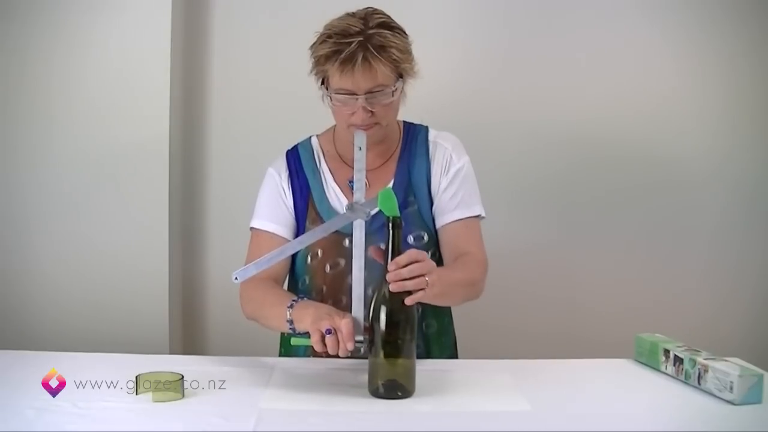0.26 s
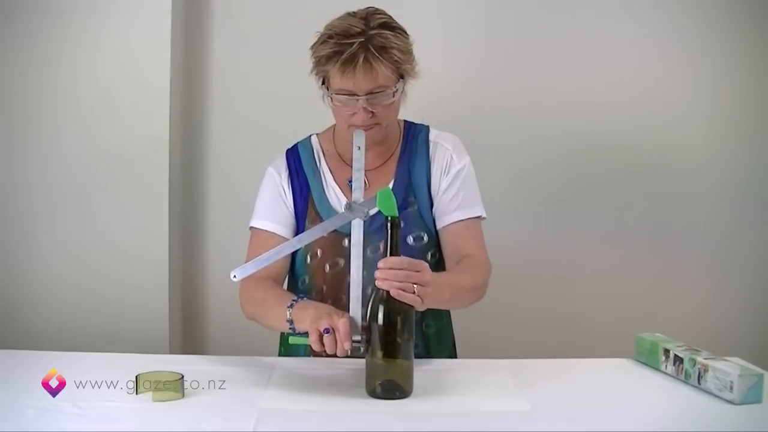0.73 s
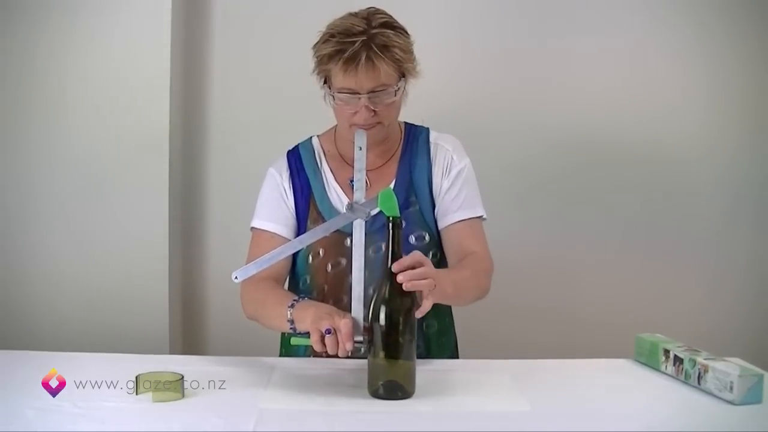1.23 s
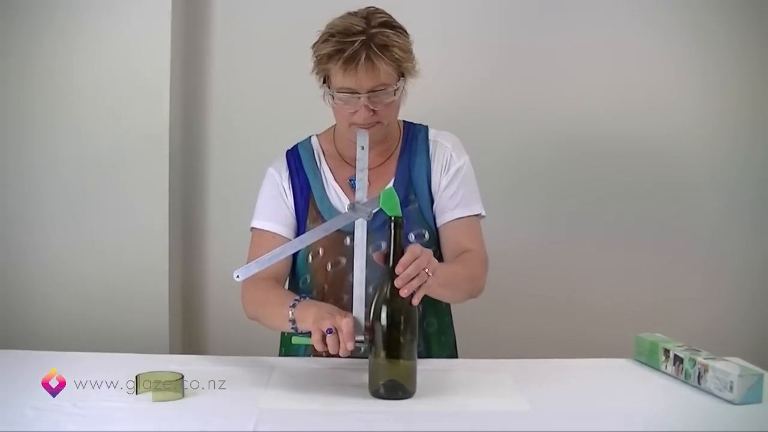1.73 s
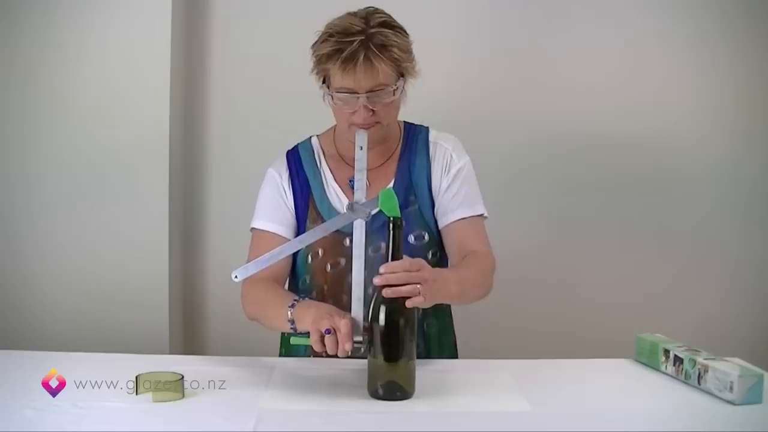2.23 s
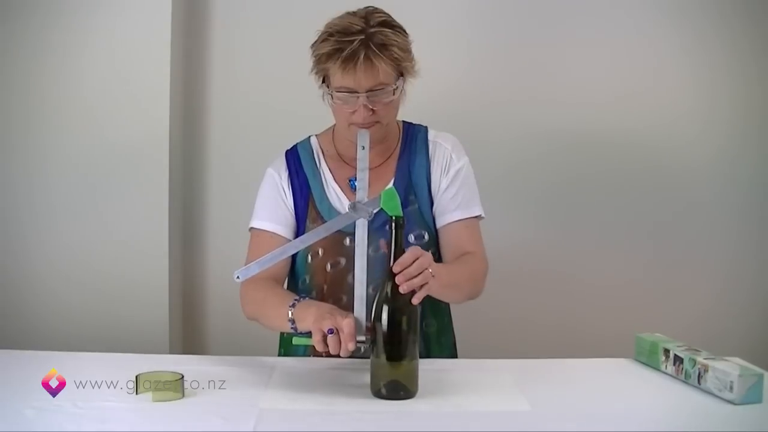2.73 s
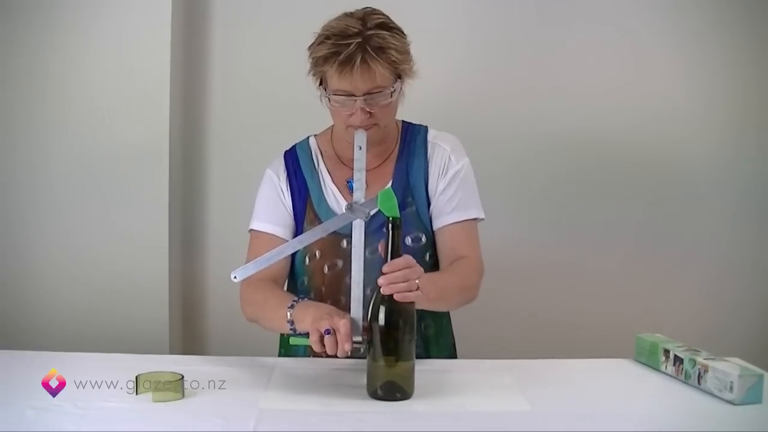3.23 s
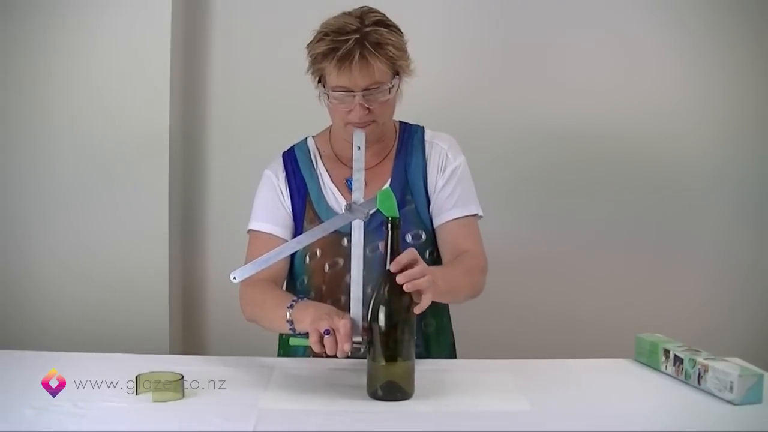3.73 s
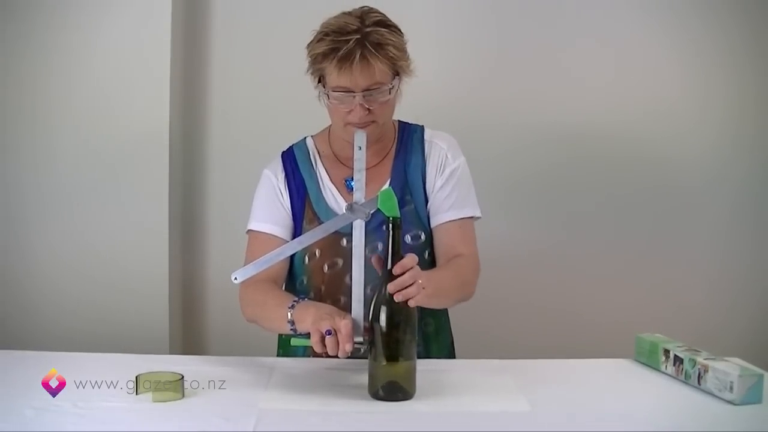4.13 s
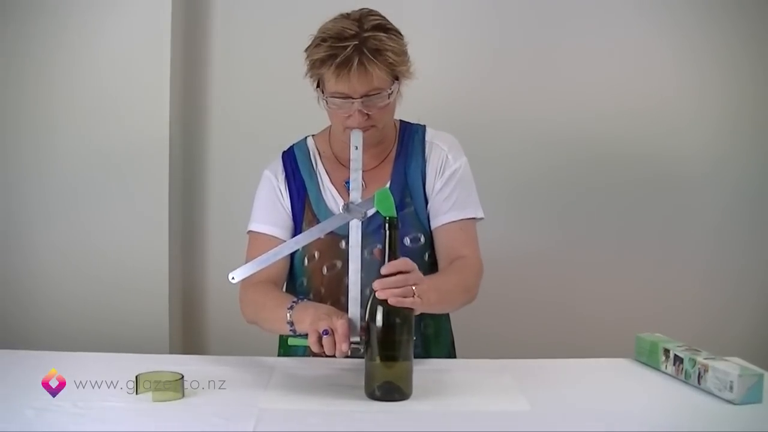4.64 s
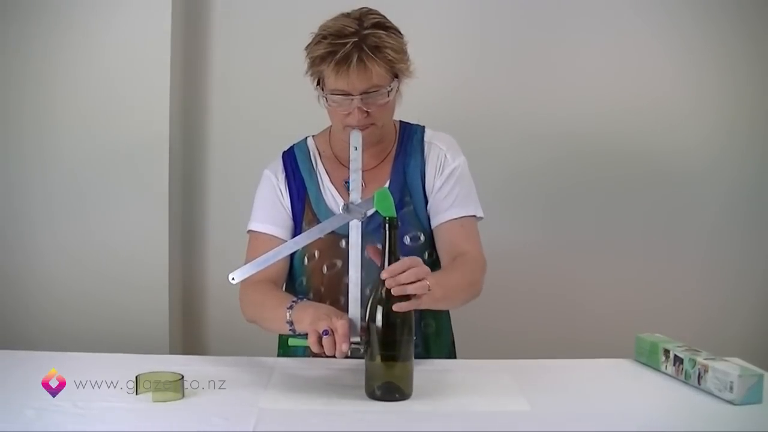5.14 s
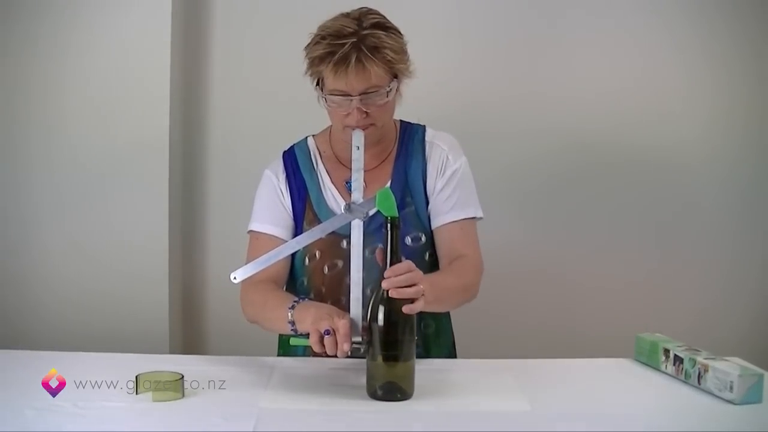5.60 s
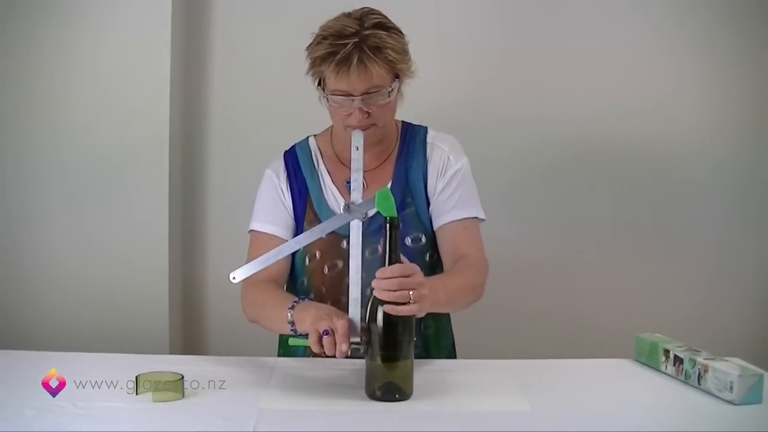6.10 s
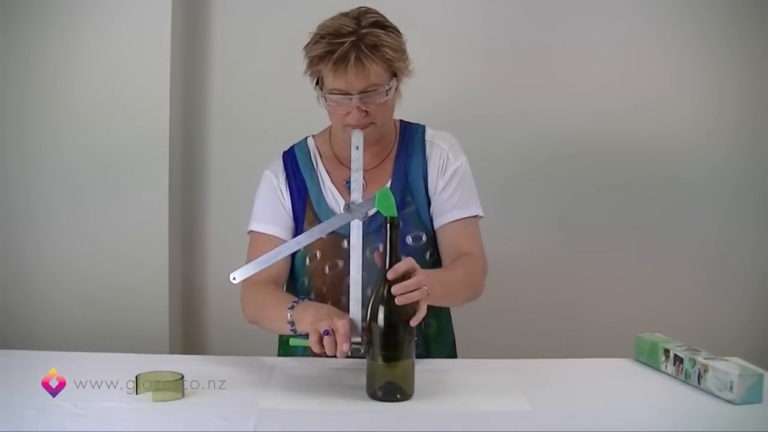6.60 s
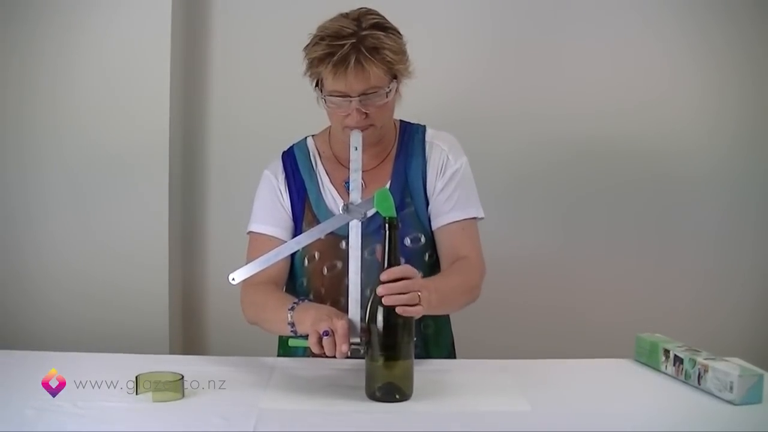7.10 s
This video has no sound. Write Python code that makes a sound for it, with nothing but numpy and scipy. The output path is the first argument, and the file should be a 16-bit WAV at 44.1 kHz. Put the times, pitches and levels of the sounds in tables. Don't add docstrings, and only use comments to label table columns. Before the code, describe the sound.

Thin, dry scratching of a wheel on glass, close to a stereo microphone: uneven short strokes, stuttering as the wheel sticks, with light ticks and a low scrape of the bottle on the table. One hard metallic-glassy crack far louder than everything else, two muffled bounces, more strokes, a bright ring tap, and light scratching to the end. Faint room hum throughout.

```python
import sys
import numpy as np
from scipy import signal
from scipy.fft import rfft, irfft
from scipy.io import wavfile
from scipy.ndimage import uniform_filter1d

SR = 44100
rng = np.random.default_rng(int(sys.argv[2]) if len(sys.argv) > 2 else 0)


def natural_amplitude(level_db):
    exponent = np.asarray(level_db, float) / 20
    return 10 ** exponent


def unload_wav(signal):
    wavfile.write(
        sys.argv[1],
        SR,
        np.round(np.clip(np.atleast_2d(signal).T, -1, 1) * 32767).astype(np.int16),
    )


N = 324511

# start_s, peak_db, brightness_db, blow_into_glass_db
TICKS = [(.004, -36.5, -12, -4), (1.009, -42, -14, 2), (3.1914, -21, -8, -25), (0.1412, -34, -8, -14),
         (0.3445, -21, -30, -20), (0.3505, -28, -30, -13), (0.4504, -25, -4, -10), (0.4565, -32, -10, -10),
         (0.463, -31, -8, -4), (0.472, -26, -9, -3), (0.2863, -28, -8, -1), (0.5815, -36, -8, -6),
         (0.585, -32, -12, -10), (0.595, -30.5, -9, 0), (0.5744, -30, -5, -5), (0.601, -37, -5, -9),
         (0.8446, -34.5, -3, -1.5), (1.719, -28.5, -24, -6), (1.799, -20, -32, -17), (1.851, -35, -12, -8),
         (1.877, -19.5, -10, -15), (2.6668, -43.5, -7, -2), (2.975, -34, -12, 10), (3.6523, -38, -13, 7.5),
         (3.66, -38, -13, 0), (4.2272, -39, 1, -14), (4.4004, -40.5, -5, 2), (4.417, -42, -11, 7),
         (4.448, -40, -14, 0), (4.441, -34.5, -11, 0), (4.548, -37, -10, 2.5), (5.5708, -34, -15, -13),
         (5.626, -35, -5, -15), (5.768, -36, -11, -4), (5.957, -36, -11, 4), (6.0144, -35.5, -13, 8.5),
         (6.2478, -30, -21, -8), (6.813, -33, -9, -1.5), (6.888, -40, -10, 5), (6.933, -37, -15, 7),
         (6.9515, -24, -34, -2), (6.961, -33, -18, 6), (7.0441, -33, -22, 10), (7.052, -36, -25, 0),
         (7.1517, -31, -10, 6), (7.158, -36, -12, 4), (7.164, -36, -8, 1), (7.17, -36, -12, 3),
         (7.199, -38, -12, 1), (7.209, -40, -14, -1)]


def evened(x):
    return x / np.sqrt(np.mean(x ** 2) + 1e-20)


def read(points, hz):
    f, value = np.transpose(points)
    return np.interp(np.log(hz + 1), np.log(f + 1), value)


def drift(per_s, count):
    knots = rng.standard_normal((count, int(N / SR * 60) + 3))
    knots = signal.lfilter([1], [1, -np.exp(-min(per_s, 50) / 10)], knots)
    return [np.interp(np.arange(N) * 60 / SR, np.arange(len(k)), evened(k)) for k in knots]


def ring(x, hz, width):
    r = np.exp(-np.pi * width / SR)
    w = 2 * np.pi * hz / SR
    return np.sqrt(2 * (1 - r * r)) * signal.lfilter([0, np.sin(w)], [1, -2 * r * np.cos(w), r * r], x)


def resonate(x, hz, width):
    turn = np.exp(2j * np.pi * np.cumsum(hz * np.ones(N)) / SR)
    r = np.exp(-np.pi * width / SR)
    return np.sqrt(2 * (1 - r * r)) * (turn * signal.lfilter([1], [1, -r], x / turn)).real


def air():
    # pitch_hz, level_db_per_hz
    noise_spectrum = [(21, -30), (35, -25), (102, -6), (148, -5), (181, -7), (227, -19), (263, -0.5),
                      (291, -7), (402, -8), (491, -13.5), (614, -14), (1170, -21.5), (1470, -24.5),
                      (3030, -30), (13500, -43)]
    # pitch_hz, likeness_0_to_1
    likeness = [(28, .3), (60, 0.81), (180, 0.96), (550, 0.93), (1650, 0.71), (4970, 0.75), (15000, 1)]
    # pitch_hz, width_hz, level_db
    hum_lines = [(98.6, 5.2, -61.5), (182.64, 7.7, -56), (264.6, 14, -59), (56.4, 15, -57),
                 (412, 25, -74.5), (626, 1.4, -71)]
    noise_db, noise_edge_hz = -48.5, 13620
    mains_hz, mains_db = 99.6, -53

    frames, hz = N // 512 + 5, np.fft.rfftfreq(2048, 1 / SR)
    a, b, c, d, patches = rng.standard_normal((frames, 1025, 5)).T
    patches = uniform_filter1d(uniform_filter1d(patches, size=10, axis=0), size=10, axis=1)
    patches = evened(patches)
    same = np.clip(read(likeness, hz), -1, 1)[:, None]
    left = a + 1j * b
    right = same * left + np.sqrt(1 - same ** 2) * (c + 1j * d)
    level = natural_amplitude(read(noise_spectrum, hz)[:, None] + 1.9 * patches) * (hz < noise_edge_hz)[:, None]
    noise = signal.istft(np.array([left, right]) * level, nperseg=2048, noverlap=1536)[1][:, :N]
    noise = natural_amplitude(noise_db) * evened(noise)

    hum = sum(natural_amplitude(db) * ring(rng.standard_normal(N), f, width) for f, width, db in hum_lines)
    wobble = 1.2 * drift(1.5, count=1)[0]
    hum += natural_amplitude(mains_db) * np.sin(2 * np.pi * mains_hz * np.arange(N) / SR + wobble)
    return noise * natural_amplitude([[.4], [-.4]]) + hum


def knock(t, bright_db, fade_s, hz):
    swell = ((t / fade_s) * np.exp(1 - t / fade_s)) ** 2
    blunt = np.sin(2 * np.pi * hz * t - np.pi) * swell
    edge = np.sin(2 * np.pi * 7800 * t) * (t / .0001) * np.exp(-t / .0001)
    return blunt + natural_amplitude(bright_db + 7.5) * edge


def ticks():
    out, t = np.zeros(N + 300), np.arange(300) / SR
    for s, peak_db, bright_db, _ in TICKS:
        tick = knock(t, bright_db, fade_s=.00022, hz=3500 + 35 * bright_db)
        out[round(s * SR):][:len(t)] += natural_amplitude(peak_db - 3) * tick
    return out[:N]


def push(start, rise, hold, level_db, start_db, stop_db_per_s):
    t = np.arange(0, N, 32) / SR - start
    rise = max(rise, .001)
    db = start_db * np.clip(1 - t / rise, 0, 1) - stop_db_per_s * np.maximum(t - rise - hold, 0)
    return natural_amplitude(level_db + db) * (t >= 0)


def fill(gain):
    return np.interp(np.arange(N), np.arange(0, N, 32), gain)


def chatter(low):
    slips_per_s, fade_s, slow_share, smooth_db = 90, .004, .65, -39.5
    slips = (rng.random(N) < slips_per_s / SR) * rng.uniform(0.62, 1, N)
    bursts = evened(signal.lfilter([1], [1, -np.exp(-1 / (fade_s * SR))], slips))
    share = slow_share / (1 + (low / natural_amplitude(smooth_db)) ** 4)
    return np.sqrt(1 - share + share * bursts ** 2)


def jolts():
    # start_s, treble_peak_db
    early_jolts = [(0.2745, -31), (0.3596, -33.5), (0.4493, -44), (0.573, -39), (0.593, -29), (0.6398, -44),
                   (0.662, -26), (0.7097, -23), (0.7385, -29), (0.7513, -20), (0.8434, -42), (1.7289, -44),
                   (1.7772, -47), (1.7827, -45), (1.843, -23.5), (1.875, -39), (1.905, -28), (1.955, -26),
                   (2.0023, -23), (2.975, -36), (3.0339, -38), (3.0986, -25), (3.2923, -26), (3.3387, -25),
                   (3.656, -41), (4.2257, -52), (4.398, -48), (4.547, -43), (4.7714, -41), (4.7984, -36)]
    # start_s, treble_peak_db
    last_jolts = [(5.5662, -39), (5.575, -43), (5.583, -38), (5.678, -37), (5.728, -41), (5.776, -43),
                  (5.81, -32), (5.82, -38), (5.872, -45), (5.977, -45), (6.05, -49), (5.6238, -32),
                  (5.6455, -41), (5.6679, -38), (5.6963, -31), (5.768, -32), (5.7987, -39), (5.8406, -38),
                  (5.9564, -38), (6.014, -44), (6.0361, -42), (6.0591, -44), (6.072, -33), (6.2458, -40),
                  (6.7111, -47), (6.7233, -32), (6.813, -45), (6.8413, -33), (6.8875, -32), (6.932, -27.5),
                  (6.9904, -42), (7.011, -34), (7.0438, -45), (7.1236, -45), (7.1511, -33.5), (7.199, -35),
                  (7.275, -48), (7.2878, -53), (7.3177, -42)]
    fade_s = 0.0043
    kicks = np.zeros(N)
    for s, peak_db in early_jolts + last_jolts:
        kicks[round(s * SR)] = natural_amplitude(peak_db)
    return signal.lfilter([1], [1, -np.exp(-1 / (fade_s * SR))], kicks)


def pressure():
    # start_s, rise_s, hold_s, scoring_level_db, brightness_db
    strokes = [(0.242, 0.029, 0.036, -39.5, -4.5), (0.435, 0.03, 0.039, -41.5, -5),
               (0.61, 0.044, 0.022, -33.5, -8), (0.701, 0.016, 0.051, -31.5, -6),
               (1.766, 0.012, 0.11, -42, -1), (1.879, 0.044, 0.2, -33.5, -5),
               (2.951, 0.024, 0.092, -39, -4.5), (3.083, 0.0087, 0.23, -36, -6.5),
               (3.252, 0.027, 0.1, -33, -8), (4.625, 0.076, 0.1, -34, -3.5), (5.619, 0.016, 0.089, -44, -7),
               (5.765, 0.0087, 0.1, -42.5, -5), (6.029, 0.067, 0.023, -30, -5.5),
               (6.877, 0.006, 0.026, -43.5, -0.5), (6.942, 0.063, 0.05, -39.5, -3),
               (7.09, .006, 0.052, -46.5, -5.5), (7.139, 0.006, 0.045, -43.5, -3)]
    # start_s, rise_s, scoring_level_db, brightness_db
    short_slips = [(.132, 0.012, -66, -6), (.555, 0.039, -37.5, -12), (.838, 0.0082, -46.5, -8),
                   (.97, 0.036, -50, -8), (1.716, 0.0028, -55, 1), (1.871, 0.0055, -46, -4),
                   (2.66, .006, -63, -3), (3.652, 0.001, -48.5, -0.5), (4.18, 0.032, -54, -5),
                   (4.31, 0.022, -53.5, -10), (4.396, 0.0044, -45.5, -4), (4.436, .004, -48, -4),
                   (4.546, 0.043, -34, -4.5), (5.324, 0.005, -46.5, -3.5), (5.561, 0.015, -34.5, -7.5),
                   (5.95, 0.025, -45.5, -3), (6.7, 0.0089, -49, 3), (6.81, 0.0043, -45.5, -7),
                   (6.838, 0.0033, -48, -4), (6.92, 0.028, -32.5, -10), (7.268, 0.017, -40.5, -6)]
    start_db = -18
    stop_db_per_s, slip_db_per_s = 460, 326
    creep_db, creep_db_per_s = -25, 48

    low = high = 0
    for start, rise, hold, level_db, bright_db in strokes:
        gain = push(start, rise, hold, level_db, start_db, stop_db_per_s)
        gain += push(start, rise, hold, level_db + creep_db, start_db, creep_db_per_s)
        low, high = np.hypot(low, gain), np.hypot(high, gain * natural_amplitude(bright_db))
    for start, rise, level_db, bright_db in short_slips:
        gain = push(start, rise, 0, level_db, start_db, slip_db_per_s)
        low, high = np.hypot(low, gain), np.hypot(high, gain * natural_amplitude(bright_db))
    low, high = fill(low), fill(high)
    jolt = natural_amplitude(-4.5) * jolts()
    return np.hypot(low, jolt), np.hypot(high * chatter(low), jolt)


def cracks(per_s, spread_db):
    size = natural_amplitude(spread_db * np.minimum(rng.exponential(1, N), 5))
    return evened(size * rng.choice([-1., 1.], N) * (rng.random(N) < per_s / SR))


def scatter(x):
    return x * (2 * rng.integers(0, 2, N, dtype=np.int8) - 1)


def scoring():
    wall_hz = [2020, 2865, 3430, 4060, 5280, 5770, 6560, 7115, 7930, 9020, 9440, 10900, 11200, 11700, 12050,
               13100, 14100, 2885, 4085]
    # width_hz, level_db
    wall = [(80.7, -13), (28, 1), (70.4, -9.5), (17.8, -5.5), (90, -25), (70.2, -16.5), (35.2, -14),
            (64, -8), (34.4, -32), (49.7, -16.5), (60.5, -12), (150, -17), (91.3, -15), (50, -26),
            (50, -16.5), (130, -29.5), (90, -22), (10, 3.5), (8.95, 2)]
    # pitch_hz, width_hz, level_db
    pressed = [(2580, 60, -1), (4130, 50, -4), (4610, 50, -1.5), (4790, 70, -9)]
    # pitch_hz, width_hz, level_db
    arm = [(3110, 62, 0), (4440, 66, -1), (2530, 60, -10), (3660, 50, -11)]
    # time_s, light_contact_share_0_to_1, arm_pitch_factor
    lean = [(.56, .75, 1.01), (.72, .05, 1.006), (1.72, .8, 1), (1.77, .05, 1), (2.98, .15, 1.01),
            (3.0, .95, 1), (3.045, .95, 1.018), (3.09, .9, 1.004), (3.11, .05, 1), (3.45, .05, 1),
            (3.64, .75, 1.01), (4.73, .95, .997), (4.84, .95, .965), (5.5, .95, .99), (5.56, .15, .997),
            (6.1, .2, .99), (6.7, .9, 1), (7.3, .95, .985)]
    # pitch_hz, level_db_per_hz
    grit_spectrum = [(530, -20.5), (900, -37), (1600, -0.5), (2200, 1.5), (2860, 2.5), (4600, 4),
                     (6120, -20.5), (6980, -2), (8150, -15), (11100, -14), (14600, -31), (15500, -69)]

    drive = cracks(per_s=4000, spread_db=2.5) * natural_amplitude(2.06 * drift(13, count=1)[0])
    low, high = drive * np.array(pressure()) * natural_amplitude([[0], [7.5]])
    blows, bright_blows = np.zeros(N), np.zeros(N)
    for s, peak_db, bright_db, blow_db in TICKS:
        blows[round(s * SR)] = natural_amplitude(peak_db + blow_db + 16.0)
        bright_blows[round(s * SR)] = natural_amplitude(peak_db + blow_db + bright_db + 28.0)

    s, light, arm_pitch = np.transpose(lean)
    t = np.arange(N) / SR
    light = np.clip(np.interp(t, s, light), 0, 1)
    arm_pitch = np.interp(t, s, arm_pitch)

    out = np.zeros(N)
    turns = iter(drift(30.0, count=len(wall + pressed + arm)))
    for hz, (width, db) in zip(wall_hz, wall):
        if hz >= 8500:
            width = width * 1.6
        shake = low + blows if hz < 5500 else high + bright_blows
        if 8500 < hz < 10000 or hz > 12500:
            shake = shake * (1 - .5 * light)
        out += np.sqrt(width) * ring(scatter(shake) * natural_amplitude(db + 0.37 * next(turns)), hz, width)
    for hz, width, db in pressed:
        shake = scatter(low + blows) * (1 - light) * natural_amplitude(db + 1.5 + 2.0 * next(turns))
        out += np.sqrt(width) * resonate(shake, hz * arm_pitch, width)
    for hz, width, db in arm:
        grip = next(turns)
        shake = scatter(low + blows) * light * natural_amplitude(db + 3.5 + 2.4 * grip)
        out += np.sqrt(width) * resonate(shake, hz * arm_pitch * (1 + .005 * grip), width)

    hz = np.fft.rfftfreq(N, 1 / SR)
    treble = 1 / (1 + (5700 / (hz + 1)) ** 12)
    crackle = rfft(low) * (1 - treble) + rfft(high) * treble
    grit = irfft(crackle * natural_amplitude(read(grit_spectrum, hz)), N)
    return natural_amplitude(-29.5) * out + natural_amplitude(-6.0) * grit


def drag():
    # start_s, rise_s, hold_s, level_db
    drags = [(0.256, 0.033, 0.11, -50), (0.543, 0.028, 0.14, -52), (0.739, 0.011, 0.013, -43),
             (1.75, 0.064, 0.013, -42.5), (1.885, 0.082, 0.18, -38.5), (2.943, 0.079, 0.015, -45),
             (3.122, 0.025, 0.062, -50), (3.237, 0.12, 0.012, -33.5), (4.512, 0.097, .01, -45),
             (4.654, 0.064, 0.079, -38.5), (5.818, 0.046, .005, -47), (6.05, 0.061, 0.012, -36),
             (6.876, 0.16, 0.0092, -45), (7.131, 0.059, 0.0034, -46.5), (7.246, 0.049, 0.0098, -40)]
    # pitch_hz, width_hz, level_db
    table_modes = [(289.8, 11.5, 0.5), (349, 34, -17.5), (431, 63, 3.5), (530, 51, -1), (616, 30, -2),
                   (790, 174, 0), (1230, 550, -7)]
    gain = fill(sum(push(*row, start_db=-22.5, stop_db_per_s=182) for row in drags))
    rub = cracks(per_s=1500, spread_db=2.0) * gain
    top = sum(natural_amplitude(db) * ring(rub, hz, width) for hz, width, db in table_modes)
    return natural_amplitude(-7.5) * signal.sosfilt(signal.butter(4, 215, "high", fs=SR, output="sos"), top)


def rattle(length):
    # pitch_hz, level_db_per_hz
    frame_spectrum = [(700, -9), (1500, 1.5), (3000, 5.5), (4400, -12), (5100, -19), (6000, -15),
                      (7000, -16), (10500, -22), (14500, -34)]
    level_db, t60_s = -23.5, 0.054
    hz, t = np.fft.rfftfreq(length, 1 / SR), np.arange(length) / SR
    clatter = rfft(rng.standard_normal(length)) * natural_amplitude(read(frame_spectrum, hz))
    return evened(irfft(clatter, length)) * natural_amplitude(level_db - 60 * t / t60_s)


def strikes(events, object_modes, split, damping, blur_hz):
    out, t = np.zeros(N), np.arange(16000) / SR
    hz, mode_db, t60 = np.transpose(object_modes * 3)[:, :, None]
    neighbour = (np.arange(len(hz)) >= len(object_modes))[:, None]
    hz = hz * (1 + split * rng.standard_normal(hz.shape) * neighbour)
    t60 = t60 * damping * np.where(neighbour, .4, 1)
    t60 = t60 * np.where(hz > 5500, .85, 1)
    phases = 2 * np.pi * rng.random((len(events), len(hz), 1))
    steps = rng.standard_normal((len(hz), len(t)))
    wander = np.sqrt(2 * np.pi * blur_hz / SR) * np.cumsum(steps, axis=1)
    for (s, peak_db, bright_db, ring_db), phase in zip(events, phases):
        level_db = mode_db + (bright_db - events[0][2]) * (hz > 5500) - 3 * neighbour
        modes = natural_amplitude(level_db - 60 * t / t60) * np.sin(2 * np.pi * hz * t + phase + wander)
        tail = modes.sum(0) * (1 - np.exp(-t / 0.00025))
        blow = knock(t, bright_db, fade_s=.00031, hz=3100)
        out[round(s * SR):][:len(t)] += natural_amplitude(peak_db) * (blow + natural_amplitude(ring_db) * tail + rattle(len(t)))
    return out


def snap():
    # start_s, peak_db, brightness_db, ring_db
    snaps = [
        (5.0634, .3, -13, -24.5),
    ]
    struck_hz = [2003, 2565, 2595, 2864, 2950, 3050, 3128, 3195, 3280, 3410, 3618, 3800, 4060, 4311, 4438,
                 4520, 4904, 5200, 5780, 6212, 6568, 6724, 7025, 7763, 8075, 8592, 9421, 10220, 10900,
                 11170, 12070, 14060]
    # level_db, t60_s
    struck = [(-16, 0.19), (-13, 0.3), (-2.5, 0.16), (-11, 0.4), (-2, 0.13), (3.5, 0.13), (-8, 0.37),
              (-16, 0.2), (-4.5, 0.36), (-18, .1), (-21, 0.17), (-22, 0.16), (-7, 0.38), (-2, 0.11),
              (5, 0.12), (-0.5, 0.2), (-30.5, 0.198), (-16, 0.16), (-23, 0.2), (-27, .18), (-19, 0.23),
              (-10, 0.16), (-26, .23), (-10, 0.1), (-27, 0.16), (-19.5, 0.18), (-6, 0.1), (-34, .15),
              (-11, 0.15), (-22, 0.19), (-28, 0.19), (-30, .12)]
    modes = [(hz, *mode) for hz, mode in zip(struck_hz, struck)]
    return strikes(snaps, modes, split=.004, damping=1.0, blur_hz=8)


def bounces():
    # start_s, peak_db, brightness_db, ring_db
    rebounds = [
        (5.3693, -17, -24, -17),
        (5.419, -18, -25, -19),
    ]
    # pitch_hz, level_db, t60_s
    held = [(2433, -16, .12), (2842, -6, .24), (3050, 1, .13), (3170, -2, .06), (3400, -12, .1),
            (4037, -9, .18), (4274, -10, .08), (4404, 0, .07), (5800, -20, .06), (6800, -20, .12),
            (7100, -22, .1), (8570, -26, .14), (9378, -24, .08)]
    return strikes(rebounds, held, split=.012, damping=.8, blur_hz=10)


def clink():
    # start_s, peak_db, brightness_db, ring_db
    taps = [
        (6.7245, -33.5, 4.1, -6.5),
    ]
    # pitch_hz, level_db, t60_s
    neck = [(1669, -19, 0.34), (3330, -7, 0.4), (5642, -3, 0.24), (6115, -10, 0.17), (6568, 0, 0.2),
            (7897, -13, 0.22), (9329, -12, 0.28), (9394, -3, 0.25), (11230, -16, 0.095), (11520, -27, 0.44),
            (13400, -19, 0.14), (14020, -21, 0.16)]
    return strikes(taps, neck, split=.008, damping=.5, blur_hz=25)


def room(x):
    # pitch_hz, t60_s
    decay = [(200, 0.048), (1000, 0.25), (3000, 0.32), (7000, 0.39), (14000, 0.065)]
    taps = np.zeros((2, SR // 2))
    at = np.arange(400, SR // 2 - 20, 20) + rng.integers(0, 20, (3, (SR // 2 - 401) // 20))
    signs = rng.choice([-1., 1.], at.shape)
    np.put_along_axis(taps, at[:2], signs[:2], 1)
    taps = taps[0] + 0.23 * taps[1] * np.array([[1], [-1]])
    hz, t, z = signal.stft(taps, SR, nperseg=256)
    tail = signal.istft(z * natural_amplitude(-60 * t / read(decay, hz)[:, None]), SR, nperseg=256)[1]
    return signal.fftconvolve(x[None], tail / np.linalg.norm(tail[0]), axes=1)[:, :N]


def scene():
    background = air()
    hits = snap() + bounces() + clink()
    no_bass = signal.butter(2, 550, "high", fs=SR, output="sos")
    hits = signal.sosfilt(no_bass, hits)
    glass = ticks() + scoring() + hits
    table = drag()
    near = glass * natural_amplitude([[-.3], [.3]]) + table * natural_amplitude([[.2], [-.2]])
    shaken = natural_amplitude(-11) * hits
    return near + natural_amplitude(-12.0) * room(glass + table + shaken) + background


def roll_off(x):
    return signal.sosfilt(signal.butter(12, 15780, fs=SR, output="sos"), x)


def record(dry):
    edge_hz, shelf_hz, shelf_db = 15060, 14340, -21
    edge = signal.firwin(511, edge_hz, window=("kaiser", 6), fs=SR)[None]
    shelf = signal.firwin(511, shelf_hz, window=("kaiser", 6), fs=SR)
    taps = natural_amplitude(shelf_db) * edge + (1 - natural_amplitude(shelf_db)) * shelf
    limited = signal.oaconvolve(np.clip(dry, -1, 1), taps, "same") + natural_amplitude(-62) * dry
    limited = signal.sosfilt(signal.butter(2, 42, "high", fs=SR, output="sos"), limited)
    return roll_off(limited)


dry = scene()
out = record(dry)
unload_wav(out)
```